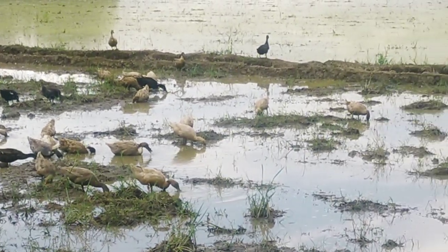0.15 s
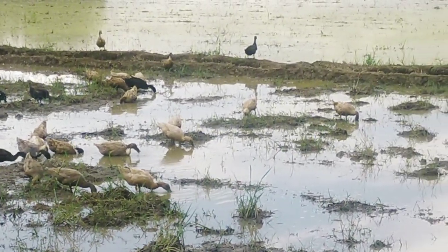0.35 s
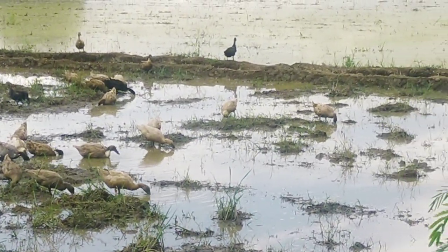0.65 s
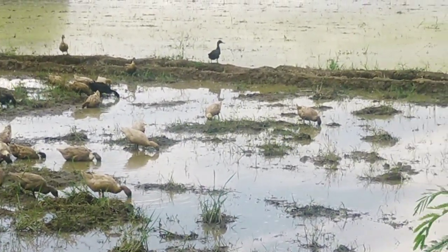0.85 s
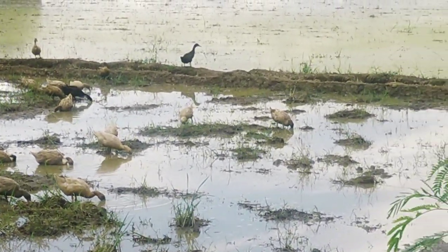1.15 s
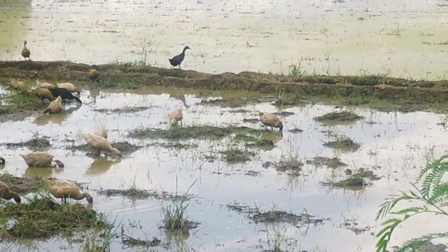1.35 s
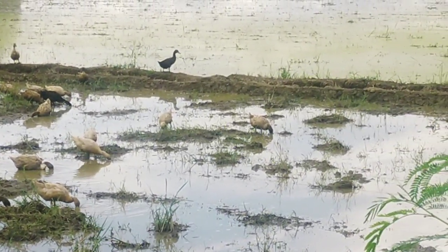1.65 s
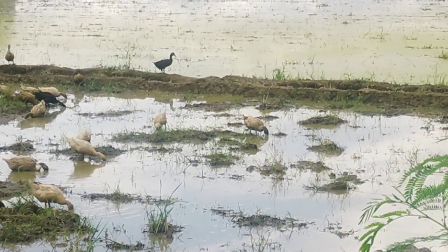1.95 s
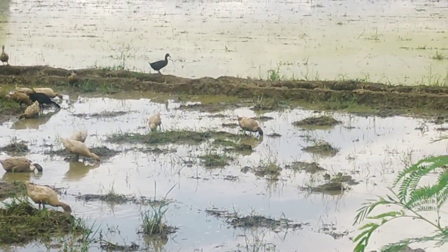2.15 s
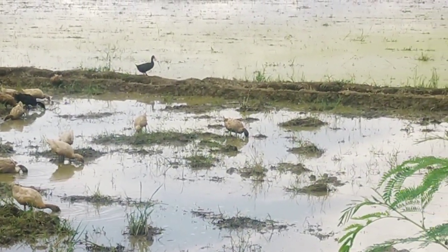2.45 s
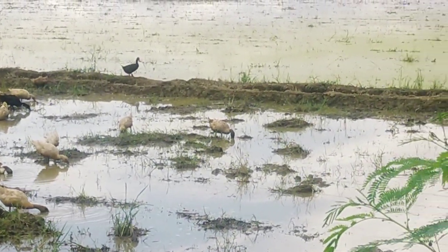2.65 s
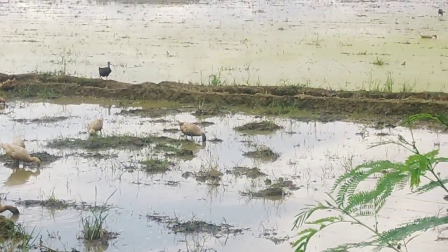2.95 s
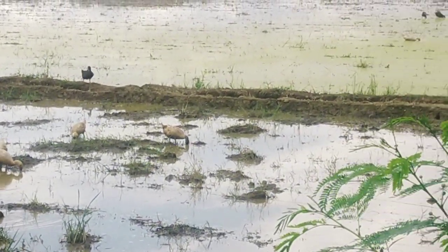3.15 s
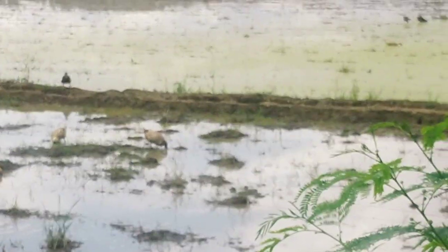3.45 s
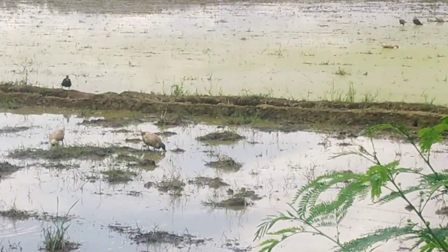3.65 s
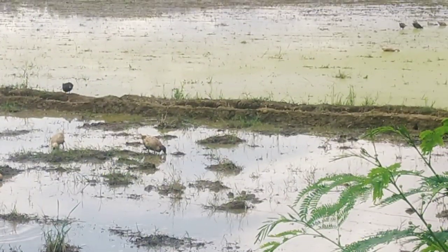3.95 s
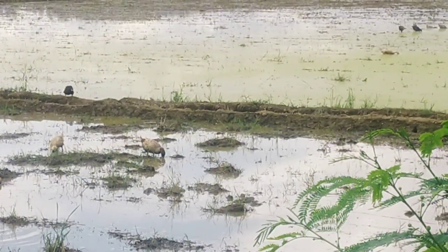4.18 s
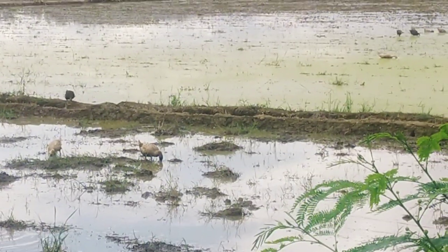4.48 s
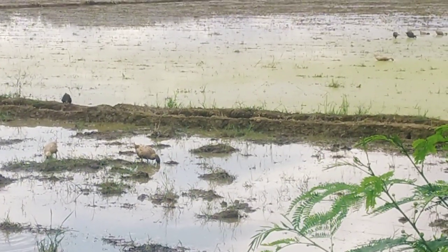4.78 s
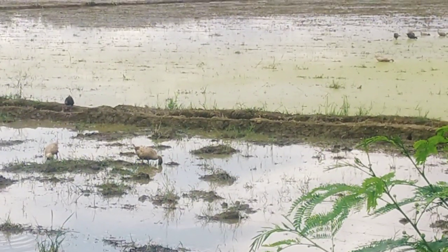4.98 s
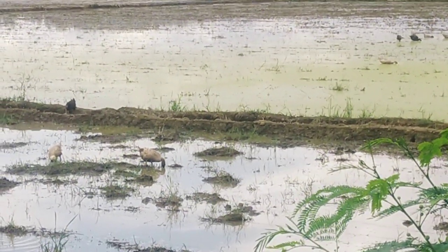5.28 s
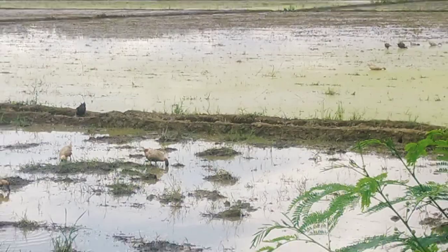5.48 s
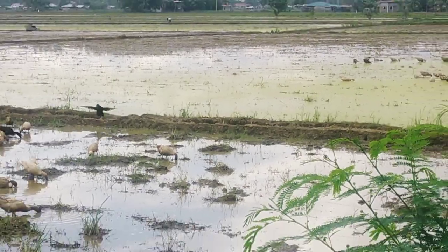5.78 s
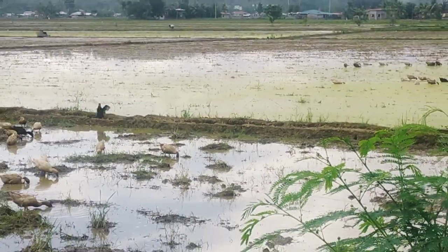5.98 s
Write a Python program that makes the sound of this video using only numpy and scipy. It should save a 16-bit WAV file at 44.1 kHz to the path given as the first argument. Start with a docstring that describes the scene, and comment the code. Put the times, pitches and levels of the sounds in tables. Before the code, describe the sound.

Outdoors by a flooded field, a slow single-cylinder engine thumps steadily and recedes. Ducks give a few short, soft nasal quacks, with wet bill clicks and tiny droplets. A motorbike rises from behind the chugging, whirring and clattering nearer, then knocks once and passes very close with a loud rasp as its pitch drops. A single microphone at the roadside hears faint open-air hiss and distant road noise.

```python
"""In a flooded field beside a road, ducks dabble and quack while two vehicles pass through.
A motorbike approaches and passes close by: harmonic exhaust puffs, cyclic noise and narrow tones,
each part weighted by distance and angle, with Doppler shift; the rasp is strongest beside and behind.
A slow single-cylinder vehicle thumps away, each firing a low tone burst that weakens with distance.
Quacks are rough harmonic buzzes, bill clicks and droplets are noise bursts, the field is soft noise."""
import sys
import numpy as np
from scipy import signal
from scipy.fft import rfft, irfft, next_fast_len
from scipy.io import wavfile
from scipy.ndimage import uniform_filter1d, map_coordinates

SR = 44100
rng = np.random.default_rng(int(sys.argv[2]) if len(sys.argv) > 2 else 0)


def int16_out(signal):
    """Quantize to a 16-bit WAV file."""
    q = np.round(np.clip(np.atleast_2d(signal).T, -1, 1) * 32767)
    wavfile.write(sys.argv[1], SR, q.astype(np.int16))


N = 269892
TIME = np.arange(N) / SR
TOP_HZ = 15800

# the motorbike on a straight road: nearest moment, nearest distance, speed
PASS_S, PASS_M, BIKE_M_PER_S = 5.88, 2.2, 10
SOUND_M_PER_S = 343
# distance past the nearest point where the exhaust is heard wholly from behind, and its gain there
REAR_AFTER_M, REAR_DB = 2.35, 3
# one short knock as the bike comes up
CLUNK_S, CLUNK_HZ, CLUNK_DB, CLUNK_WIDTH_S = 5.572, 1500, -19.5, 0.0025
# firing rate of the bike's engine before Doppler shift: start_s, firings_per_s
BIKE_FIRING_RATE = [(2.7, 45.15), (3.2, 44.78), (4.3, 44.77), (5.2, 44.3), (5.8, 44.74), (6.12, 44.14)]
# directivity of each part of the bike: level_db (on its aim, at the nearest distance),
# loss_db_per_m, aim_deg (from straight ahead), off_aim_db (lost 90 degrees off the aim)
EXHAUST_DIRECTIVITY = (-24.1, 0.02, 155, 0.5)
CLATTER_DIRECTIVITY = (-29, -0.03, 38, 0.1)
GEAR_DIRECTIVITY = (-31.5, .04, 3, 19)
FIN_DIRECTIVITY = (-23.9, 0.15, 81.5, 21)
TYRE_DIRECTIVITY = (-36, 0.13, 42, 4.5)
CHAIN_DIRECTIVITY = (-31, 0.56, 74, 16)
RASP_DIRECTIVITY = (-17.5, 0.3, 105, 20.5)
# swell and ease of the clatter and gear whine: start_s, gain_db
CLATTER_SWELL_CURVE = [(2.5, -1.3), (3.2, 0), (3.8, 1.7), (4.6, 1.6), (5.2, 0.1), (5.6, -1.5), (5.85, 0.7)]
# exhaust harmonics from ahead and from behind: order (multiple of firing rate), level_db (relative)
FRONT_HARMONICS = [(1, -5), (2, 3), (3, -5.5), (4, -5), (5, -1.5), (6, -5.5), (7, -10.5), (8, -18.5),
                   (9, -20)]
REAR_HARMONICS = [(1, 1), (2, -1), (3, -4), (4, 2.5), (5, -1.5), (6, -9), (7, -11), (8, -12.5), (9, -19)]
# tailpipe and cooling-fin resonances: centre_hz (about the nearest moment), width_hz, level_db (relative)
TAILPIPE_MODES = [(1543, 19, -0.5), (1590, 210, -10.5), (2050, 110, -2.5)]
FIN_MODES = [(3575, 70, 0.5), (4030, 60, -9), (4282, 64, 0)]
# gear and valve-train tones: pitch_hz (as heard at 4.5 s), level_db (relative)
WHINE_TONES = [(506.0, -62.5), (640.6, -57.5), (732.1, -59), (958.2, -63.5), (1012, -58), (1303, -56.5),
               (1427, -59), (1610, -55), (1701, -60), (1997, -62), (2299, -60.5), (3289, -69), (3531, -64)]

# the slow vehicle drives straight away: distance at the start, speed
SLOW_START_M, SLOW_M_PER_S = 7.9, 6.1
# its firing rate as the driver opens the throttle a little: start_s, firings_per_s
THUMP_FIRING_RATE = [(0, 19.15), (1, 19.3), (1.6, 20.3), (2, 20.3), (3, 20)]
# its parts: level_db (at the start), loss_db_per_m (over the ground)
THUMP_LEVEL = (-37, 0.045)
ROLL_LEVEL = (-47, 0.16)
KNOCK_LEVEL = (-55.5, 0.99)
SWISH_LEVEL = (-57, .7)

# quacks: start_s, length_s, pitch_hz (top of the arch), level_db, brightness_db_per_octave (above 1300 Hz)
QUACK_EVENTS = [(.70, .083, 327.5, -57, -19), (.98, .079, 333, -55, -31), (1.47, .09, 311, -52.5, -36),
                (1.737, .094, 313, -45, -1), (3.011, 0.069, 356, -51.5, -19),
                (3.145, 0.065, 345.5, -53.5, -26)]
# pitch arch as a share, roughness 0-1, gain of the odd partials
QUACK_ARCH, QUACK_ROUGH, QUACK_ODD_DB = 0.181, 0.29, -2
# clearest bill clicks in the mud, and flicked droplets: start_s, level_db (before a common gain)
BILL_CLICKS = [(.4349, -41.5), (.525, -41), (.5746, -39), (.6173, -43), (.827, -43.5), (1.096, -46)]
DROPLETS = [(.375, -45), (1.5994, -43), (2.8639, -47), (3.6735, -43), (4.4707, -42), (4.7915, -44)]

# noise spectra and the throat's response, shape only: frequency_hz, level_db (relative)
CLATTER_SPECTRUM = [(250, -13.5), (330, -5), (420, -8.5), (520, -4), (650, -2), (860, -5), (1120, -5),
                    (1320, 1.5), (1520, -3), (1900, -3), (2300, -3), (2600, -12), (3200, -10.5),
                    (4500, -34)]
FIN_SPECTRUM = [(1500, -30), (2600, 4.5), (3000, -4), (3600, 2), (4000, 2.5), (4330, -2), (4650, -4),
                (5200, -4.5), (6800, -27)]
TYRE_SPECTRUM = [(2820, -49), (4800, -5), (6350, 2.5), (7320, -1), (8760, -14), (9200, -13), (12000, -43),
                 (20200, -120)]
CHAIN_SPECTRUM = [(5290, -41), (9000, -18), (12000, -1.5), (15100, -6.5), (15800, -10.5)]
TAILPIPE_SPECTRUM = [(600, -41), (1000, -13), (1300, -10), (1550, -1.5), (1800, -1.5), (2050, -2.5),
                     (2350, -3), (2650, -12), (3200, -20.5), (4200, -47)]
KNOCK_SPECTRUM = [(900, -30), (1700, 0), (2200, -4), (2900, -0.5), (4500, -28), (8000, -50)]
SWISH_SPECTRUM = [(3000, -20), (5000, -8), (6600, 0), (9000, -11), (11500, 4.5), (13500, 0), (15800, -1)]
ROAD_SPECTRUM = [(120, -38), (200, -2.5), (290, .5), (350, -8), (450, -10.5), (580, -6), (780, -3.5),
                 (1050, -11), (1310, -4), (1550, -7.5), (2000, -11.5), (2700, -12), (4300, -21.5),
                 (5000, -36), (7000, -63)]
AIR_SPECTRUM = [(2820, -22), (3600, -2), (4150, 4.5), (4800, -7), (5120, -10), (6510, 1.5), (7590, -3),
                (9220, -15.5), (11000, -6.5), (12300, -4), (13500, -8), (15100, -9), (15800, -5.5)]
RUMBLE_SPECTRUM = [(15, -35), (28, -14), (42, 4.5), (60, -15), (110, 0.5), (200, -5), (400, -40),
                   (800, -70)]
THROAT_RESPONSE = [(300, -31), (600, -13), (900, -16), (1230, 1.5), (1500, -5), (1800, 5), (2100, -9),
                   (2420, -7.5), (2720, -7.5), (3500, -26), (6000, -50)]
BILL_SPECTRUM = [(800, -32), (1700, -2), (2800, 6), (3700, -3), (5000, -13.5), (7000, -9), (9000, -23)]
SPLASH_SPECTRUM = [(1000, -20), (3000, -4), (7000, 3), (9000, -7), (12000, 5), (16000, -5)]


def motorbike():
    """Directivity and Doppler shift: gears aim ahead, fins and chain sideways, the exhaust rearward."""
    past_m, distance_m = bike_place()
    radial_m_per_s = BIKE_M_PER_S * past_m / distance_m
    doppler = 1 / (1 + radial_m_per_s / SOUND_M_PER_S)
    turns = cycles(curve(BIKE_FIRING_RATE) * doppler, fires_at=5.874)

    behind = np.clip(past_m / REAR_AFTER_M, 0, 1)
    front_beat = (1 - behind) * puffs(turns, FRONT_HARMONICS)
    rear_beat = behind ** 2 * amp(REAR_DB) * puffs(turns, REAR_HARMONICS)
    beat = (front_beat + rear_beat) * amp(0.73 * wobble(30))
    exhaust = passing(*EXHAUST_DIRECTIVITY) * (beat + amp(-24.5) * noise(RUMBLE_SPECTRUM))

    clatter = rattle(turns, CLATTER_SPECTRUM, repeat=0.25, depth_db=2.5, delay=0.075)
    clatter *= passing(*CLATTER_DIRECTIVITY)
    gears = passing(*GEAR_DIRECTIVITY) * whine(turns, waver=0.61)
    engine = amp(curve(CLATTER_SWELL_CURVE)) * (clatter + gears)

    fin_noise = rattle(turns, FIN_SPECTRUM, repeat=0.4, depth_db=8, delay=0.06)
    fin_ring = resonances(turns, FIN_MODES)
    fins = passing(*FIN_DIRECTIVITY) * (0.79 * fin_noise + 0.44 * fin_ring)

    tyres = rattle(turns, TYRE_SPECTRUM, repeat=0.15, depth_db=7, delay=0.15)
    tyres *= passing(*TYRE_DIRECTIVITY)
    chain = rattle(turns, CHAIN_SPECTRUM, repeat=0.11, depth_db=9, delay=0.12)
    chain *= passing(*CHAIN_DIRECTIVITY)

    rasp_noise = rattle(turns, TAILPIPE_SPECTRUM, repeat=0.42, depth_db=8.5, delay=0.3)
    rasp_ring = resonances(turns, TAILPIPE_MODES)
    rasp = passing(*RASP_DIRECTIVITY) * (0.74 * rasp_noise + 0.42 * rasp_ring)
    return exhaust + engine + fins + tyres + chain + rasp


def bike_place():
    """Uniform straight motion: metres past the nearest point, and distance from the listener."""
    past_m = BIKE_M_PER_S * (TIME - PASS_S)
    return past_m, np.hypot(past_m, PASS_M)


def passing(level_db, loss_db_per_m, aim_deg, off_aim_db):
    """Spherical spreading and directivity: 1 / distance, a change per metre and a loss off the aim."""
    past_m, distance_m = bike_place()
    angle = np.arctan2(PASS_M, -past_m)
    off_aim = np.abs(angle - np.radians(aim_deg)) / (np.pi / 2)
    ground_db = loss_db_per_m * (distance_m - PASS_M)
    return amp(level_db - ground_db - off_aim_db * off_aim) * PASS_M / distance_m


def puffs(turns, harmonics):
    """Fourier synthesis: harmonics of the firing rate sum to one sharp-fronted pressure puff a cycle."""
    orders, levels_db = np.transpose(harmonics)
    shape_db = np.interp(np.arange(65), [0, *orders, 16, 64], [-22, *levels_db, -30, -45])
    # a causal (minimum-phase) pipe: the phases follow from the levels
    cepstrum = irfft(np.log(amp(shape_db)))
    phase = np.imag(rfft(2 * cepstrum[:64], 128))
    puff = np.zeros(N)
    for order, level_db in enumerate(levels_db, 1):
        puff += amp(level_db) * np.cos(2 * np.pi * order * turns + phase[order])
    return unit(puff)


def whine(turns, waver):
    """Gear-tooth tones: sinusoids locked to engine speed that flutter in level and phase."""
    seconds = own_time(turns, heard_at=4.5)
    tones = np.zeros(N)
    for pitch_hz, level_db in WHINE_TONES:
        level = amp(level_db + 1.8 * wobble(9.7))
        tones += level * np.sin(2 * np.pi * pitch_hz * seconds + waver * wobble(10))
    return unit(tones)


def resonances(turns, modes):
    """Randomly excited narrow modes, whose pitch follows the firing rate and sinks at the pass."""
    ring = np.zeros(N)
    for centre_hz, width_hz, level_db in modes:
        def response(hz):
            """Resonance curve: gain falls to half at half the width from the centre."""
            return 1 / (1 + ((hz - centre_hz) / width_hz * 2) ** 2)
        ring += amp(level_db) * unit(filtered(rng.standard_normal(N), response))
    seconds = own_time(turns, heard_at=5.93)
    return unit(map_coordinates(ring, [seconds * SR % N]))


def own_time(turns, heard_at):
    """Time scaling: a clock in seconds that follows the heard firing rate, at true pace at heard_at."""
    return turns / np.interp(heard_at, TIME, np.gradient(turns) * SR)


def clunk():
    """Impact as a tone burst: a few cycles of one tone under a Gaussian envelope."""
    t = TIME - CLUNK_S
    envelope = np.exp(-(t / CLUNK_WIDTH_S) ** 2)
    return amp(CLUNK_DB) * envelope * np.sin(2 * np.pi * CLUNK_HZ * t)


def slow_vehicle(pipe_hz, swell_s, tail_hz, tail_db, tail_t60_s, scatter_db):
    """Impulse response: each firing swells in the silencer and leaves a short low decaying ring."""
    turns = cycles(curve(THUMP_FIRING_RATE), fires_at=0.0415)
    fired = np.diff(np.floor(turns), prepend=np.floor(turns[0]))
    strength = amp(scatter_db * rng.standard_normal(N))
    t = np.arange(SR // 10) / SR
    swell = np.exp(-((t - 2 * swell_s) / (np.sqrt(2) * swell_s)) ** 2)
    puff = swell * np.sin(2 * np.pi * pipe_hz * t)
    ring = amp(tail_db - 60 * t / tail_t60_s) * np.sin(2 * np.pi * tail_hz * t)
    thumps = unit(signal.fftconvolve(fired * strength, puff + ring)[:N])
    thumps *= receding(*THUMP_LEVEL)

    knock = rattle(turns, KNOCK_SPECTRUM, repeat=0, depth_db=12, delay=0.6)
    knock *= receding(*KNOCK_LEVEL)
    roll = receding(*ROLL_LEVEL) * noise(ROAD_SPECTRUM)
    swish = receding(*SWISH_LEVEL) * noise(SWISH_SPECTRUM)
    return thumps + knock + roll + swish


def receding(level_db, loss_db_per_m):
    """Spherical spreading: gain falls as 1 / distance, less the loss over the ground."""
    gone_m = SLOW_M_PER_S * TIME
    return amp(level_db - loss_db_per_m * gone_m) * SLOW_START_M / (SLOW_START_M + gone_m)


def cycles(rate, fires_at):
    """Phase as the integral of frequency: engine cycles elapsed, a whole number at every firing."""
    turns = np.cumsum(rate) / SR
    return turns - np.interp(fires_at, TIME, turns)


def rattle(turns, spectrum, repeat, depth_db, delay):
    """Cyclic amplitude modulation: noise surges once a cycle and sinks; a share repeats each cycle.

    repeat is a share of the power, delay a share of the cycle."""
    pattern = rng.standard_normal(SR // 46)
    same = map_coordinates(pattern, [turns % 1 * len(pattern)], mode="grid-wrap")
    drive = np.sqrt(repeat) * same + np.sqrt(1 - repeat) * rng.standard_normal(N)
    # smoothing rounds the sudden onset of each surge
    surge_db = uniform_filter1d(-depth_db * ((turns - delay) % 1), size=110)
    return coloured(drive * amp(surge_db + 1.2 * wobble(90)), spectrum)


def ducks(jitter, crest, shut_db):
    """Source and filter: a nasal harmonic buzz arches in pitch and brightens as the bill opens."""
    out = np.zeros(N)
    k = np.arange(1, 17)[:, None]
    for start_s, length_s, pitch_hz, level_db, bright_db in QUACK_EVENTS:
        span = (TIME >= start_s) & (TIME < start_s + length_s)
        u = (TIME[span] - start_s) / length_s
        opening = np.abs(np.sin(np.pi * u))
        # the voice rises fast, sinks slowly and is least steady as it starts and stops
        arch = np.abs(u - crest) ** 1.204 * np.where(u < crest, 4, 1)
        hz = pitch_hz * (1 - QUACK_ARCH * arch)
        hz = hz * (1 + jitter * (1 - 0.73 * opening) * wobble(250)[span])
        phase = 2 * np.pi * np.cumsum(hz) / SR
        # a half-closed bill dulls the upper resonances
        octaves_up = np.log2(np.maximum(k * hz / 1300, 1))
        tilt_db = (bright_db + shut_db * (1 - opening)) * octaves_up
        # each partial shakes on its own: hoarseness
        shake = np.array([wobble(300, TIME[span]) for _ in k]) * 2 * QUACK_ROUGH
        partials = amp(along(THROAT_RESPONSE, k * hz) + tilt_db + QUACK_ODD_DB * (k % 2))
        buzz = np.sum(partials * (np.sin(k * phase) + shake * np.cos(k * phase)), axis=0)
        out[span] += amp(level_db) * unit(buzz * opening ** 0.27)
    return out


def ticks(events, spectrum, t60_s, gain_db, patter_db, per_second):
    """Exponentially decaying noise bursts: clear wet clicks over a faint random patter."""
    struck = rng.random(N) < per_second / SR
    flicks = struck * amp(patter_db + 3.2 * rng.standard_normal(N))
    for start_s, level_db in events:
        flicks[round(start_s * SR)] += amp(level_db + gain_db)
    t = np.arange(SR // 10) / SR
    envelope = signal.fftconvolve(flicks, amp(-60 * t / t60_s))[:N]
    return envelope * noise(spectrum)


def field(road_db, hiss_db, rumble_db):
    """Stationary coloured noise: distant road, low rumble and open-air hiss, each wavering slightly."""
    road = amp(road_db + 0.45 * wobble(6.2)) * noise(ROAD_SPECTRUM)
    hiss = amp(hiss_db + 0.75 * wobble(5.53)) * noise(AIR_SPECTRUM)
    rumble = amp(rumble_db + 1.4 * wobble(3.76)) * noise(RUMBLE_SPECTRUM)
    return road + hiss + rumble


def noise(spectrum):
    """Spectral shaping: fresh white noise given a spectrum."""
    return coloured(rng.standard_normal(N), spectrum)


def coloured(x, spectrum):
    """Linear filtering: x shaped by a spectrum, at rms 1."""
    return unit(filtered(x, lambda hz: amp(along(spectrum, hz))))


def filtered(x, response):
    """Convolution theorem: x times a response of frequency, padded against wrap-around."""
    size = next_fast_len(N + SR // 2)
    return irfft(rfft(x, size) * response(np.fft.rfftfreq(size, 1 / SR)), size)[:N]


def along(points, hz):
    """Logarithmic frequency scale: read (Hz, value) points at hz."""
    f, values = np.transpose(points)
    return np.interp(np.log(hz + 1), np.log(f + 1), values)


def wobble(rate, time=TIME):
    """Band-limited fluctuation: a smooth random curve with rate knots a second."""
    knots = rng.standard_normal(int(N * rate / SR) + 4)
    return map_coordinates(knots, [time * rate])


def curve(rows):
    """Linear interpolation: one value per sample from (s, value) points."""
    return np.interp(TIME, *np.transpose(rows))


def unit(x):
    """Root-mean-square level: scale to rms 1."""
    return x / np.sqrt(np.mean(x ** 2) + 1e-20)


def amp(db):
    """Decibel law: level to amplitude gain."""
    return 10 ** (np.asarray(db) / 20)


def scene():
    """Superposition: both vehicles, the knock, the flock and the open field add."""
    slow = slow_vehicle(pipe_hz=114.3, swell_s=0.0043, tail_hz=56, tail_db=-9.5,
                        tail_t60_s=0.14, scatter_db=1.0)
    quacks = ducks(jitter=0.03, crest=0.3, shut_db=-24)
    bills = ticks(BILL_CLICKS, BILL_SPECTRUM, t60_s=0.02, gain_db=-2, patter_db=-52, per_second=14)
    drops = ticks(DROPLETS, SPLASH_SPECTRUM, t60_s=0.011, gain_db=-2, patter_db=-54, per_second=18)
    background = field(road_db=-54.5, hiss_db=-59, rumble_db=-53)
    return (motorbike() + clunk() + slow + quacks + bills + drops + background)[None]


def record(dry):
    """Band limiting: the microphone keeps nothing at or above TOP_HZ."""
    return filtered(dry[0], lambda hz: hz < TOP_HZ)[None]


dry = scene()
out = record(dry)
int16_out(out)
```